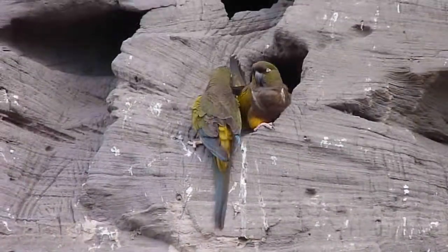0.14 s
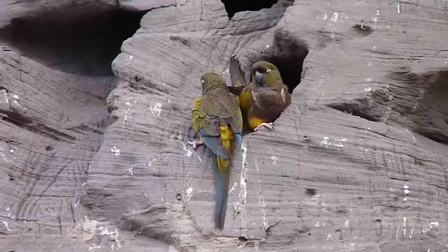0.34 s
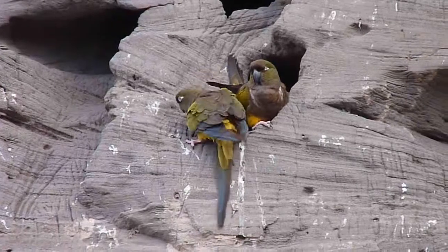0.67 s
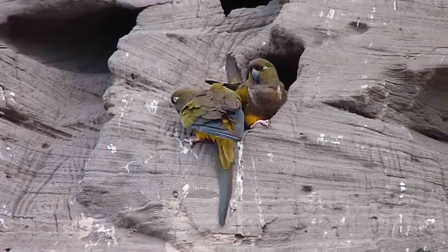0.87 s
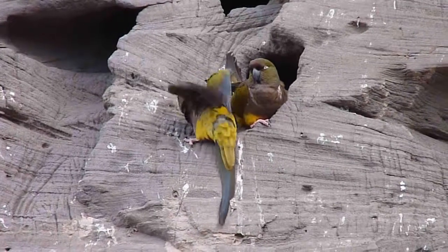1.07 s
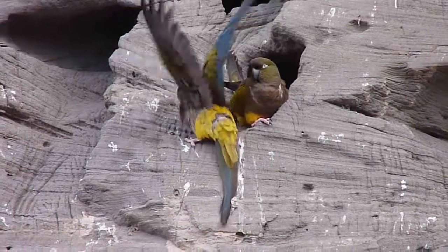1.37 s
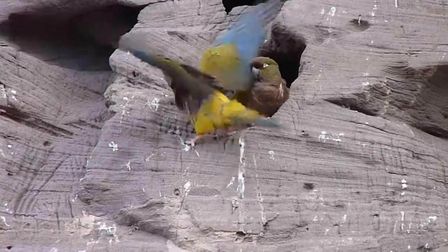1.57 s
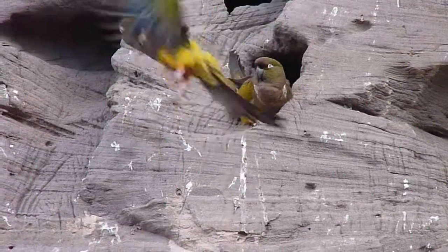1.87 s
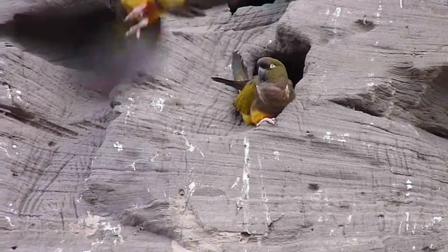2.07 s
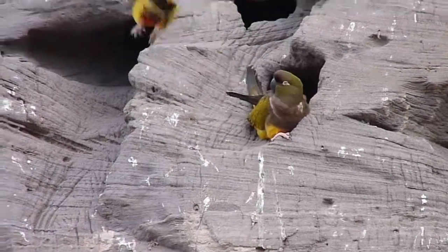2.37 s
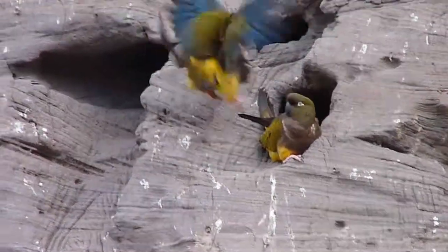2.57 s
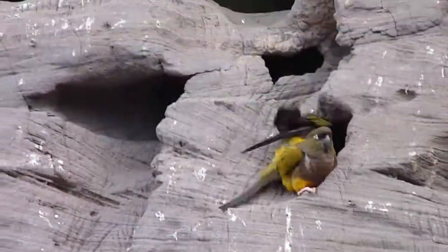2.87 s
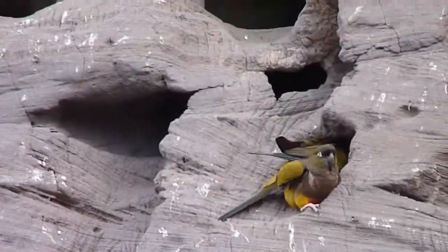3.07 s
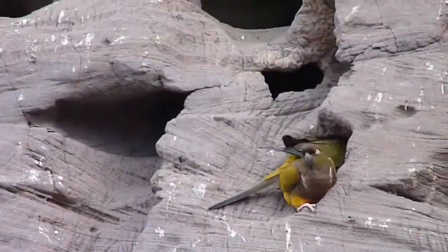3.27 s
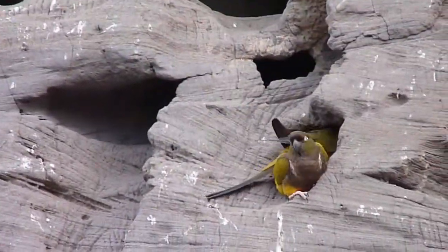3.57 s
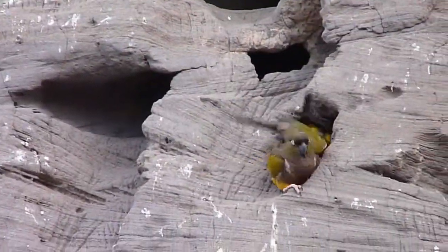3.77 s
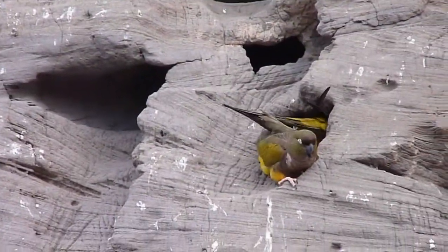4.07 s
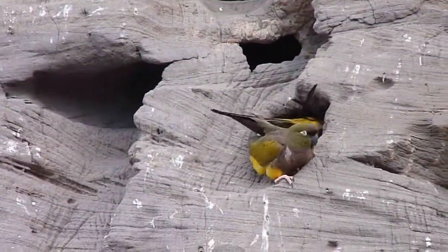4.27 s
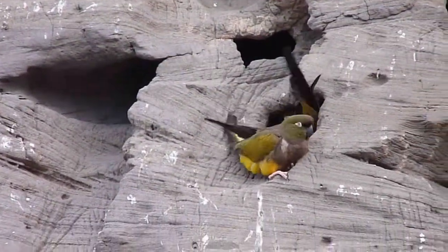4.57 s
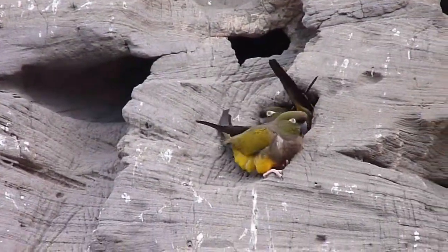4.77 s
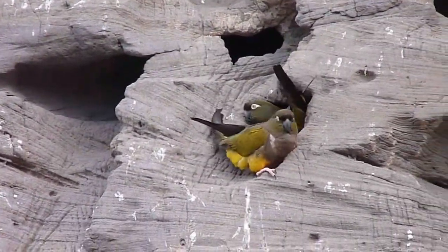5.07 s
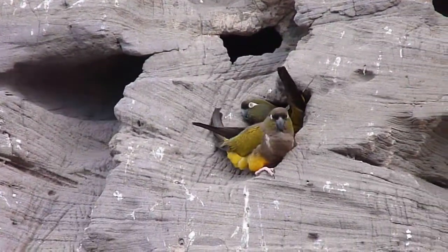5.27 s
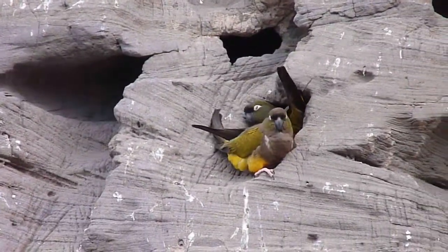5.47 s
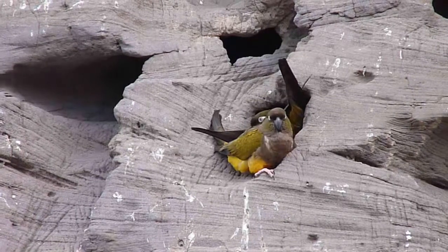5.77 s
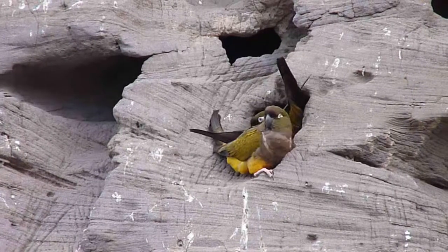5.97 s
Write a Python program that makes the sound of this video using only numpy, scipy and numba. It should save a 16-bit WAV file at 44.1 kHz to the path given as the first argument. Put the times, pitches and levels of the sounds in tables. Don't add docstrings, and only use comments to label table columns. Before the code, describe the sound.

A dense parrot colony calls without pause for about six seconds on an open cliff. From the start, far voices blur into a shrill, nasal, wavering chorus over faint distant surf, while low wind rumbles and flutters on the microphone, strongest from about 0.7 to 2.4 s. Short chirps, warbled calls and a clear whistle near 0.65 s poke out; harsh nearer screeches cluster around 2 to 2.5 s. Wind falls away near 2.8 s. A long rattling squawk swells at 2.7 to 2.9 s, another follows at 3.1, a brief one at 3.4 and a fainter one at 3.6, the far birds dipping beneath them. From 3.8 s nearer birds pile up again, raspy and trilling, especially around 5 s. Soft wind bumps return around 5.5 to 6 s, with a dull knock and sharp chirps at the end. Short rock echo; gritty small-camera sound.

```python
import sys
import numpy as np
from scipy import signal
from scipy.fft import rfft, irfft
from scipy.io import wavfile
from scipy.ndimage import uniform_filter1d
from numba import njit

SR = 44100
rng = np.random.default_rng(int(sys.argv[2]) if len(sys.argv) > 2 else 0)


def master_out(mix):
    frames = np.transpose(np.atleast_2d(mix))
    ceiling = np.clip(frames, -1, 1)
    pcm = np.round(ceiling * 32767).astype(np.int16)
    wavfile.write(sys.argv[1], SR, pcm)


def decibels_to_gain(level_db):
    exponent = np.asarray(level_db, float) / 20
    return 10 ** exponent


N = 270333


def level(x, db):
    return x * decibels_to_gain(db) / np.sqrt(np.mean(x ** 2))


def walk(rate_hz):
    hold = int(SR / rate_hz)
    steps = np.repeat(rng.standard_normal(N // hold + 1), hold)
    slewed = uniform_filter1d(uniform_filter1d(steps, hold), hold)
    return level(slewed[:N], 0)


def curves(table):
    s, *columns = np.transpose(table)
    return [np.interp(np.arange(N) / SR, s, c) for c in columns]


def colour(x, points):
    hz, db = np.transpose(points)
    bins_hz = np.maximum(np.arange(len(x) // 2 + 1) * SR / len(x), 1)
    gain_db = np.interp(np.log(bins_hz), np.log(hz), db)
    return irfft(rfft(x) * decibels_to_gain(gain_db), len(x))


@njit
def add(out, calls, gains, waver, flutter, edge, scoop):
    for c in range(len(calls)):
        start, n, place = int(calls[c, 0] * SR), int(calls[c, 1] * SR), int(calls[c, 5])
        from_hz, to_hz, rough = calls[c, 2], calls[c, 3], calls[c, 4]
        phase = place * 1.
        for i in range(max(0, -start), min(n, out.shape[1] - start)):
            u, j = i / n, (place + i) % len(waver)
            bend = 1 - scoop * (np.exp(-i / edge) + np.exp((i - n) / edge) / 2)
            hz = (from_hz + u * (to_hz - from_hz)) * bend
            phase += 2 * np.pi / SR * hz * (1 + rough * waver[j])
            push = min(1., min(i, n - i) / edge) * flutter[j] ** rough
            for k in range(5):
                out[k, start + i] += push * gains[c, k] * np.sin((k + 1) * phase)


def sing(times, rough, partial_db, edge_s, scoop):
    waver = .03 * walk(50) + .022 * walk(400)
    flutter = decibels_to_gain(4.5 * walk(70) + 3.5 * walk(250))
    places = rng.random(len(times)) * N
    calls = np.column_stack([times, np.full(len(times), rough), places])
    out = np.zeros((5, N))
    add(out, calls, np.sqrt(2) * decibels_to_gain(partial_db), waver, level(flutter, 0), edge_s * SR, scoop)
    return out


# time in seconds, rumble in dB.
GUSTS = [(0, -38), (.19, -39.5), (.7, -33), (1.37, -34.5), (1.55, -31), (1.8, -32), (1.9, -36), (2.08, -29),
         (2.32, -32.5), (2.37, -35.5), (2.77, -40), (2.83, -53.5), (3.84, -40.5), (4.22, -47.5),
         (4.45, -49.5), (5.1, -44.5), (5.3, -44), (6.13, -47)]
# centre in seconds, length in seconds, rumble change in dB.
EDDIES = [(0.126, 0.03, 14.5), (0.775, 0.075, -4), (0.87, 0.075, 2), (1.102, 0.071, 4.5), (1.3, .12, 2.5),
          (1.402, 0.057, 5), (2.26, .08, -5), (4.1, 0.22, 2.5), (4.52, 0.065, -9), (1.931, 0.051, 5.5),
          (2.938, 0.098, 3.5), (3.303, 0.17, 3.5), (3.883, 0.034, -4), (3.973, 0.075, 4.5),
          (4.075, 0.054, -11), (4.176, 0.022, 12), (4.63, 0.12, 5), (4.783, 0.094, -6), (5.1, 0.067, 5),
          (5.505, 0.069, 11.5), (5.694, 0.17, 12.5), (5.97, 0.07, -9), (6.057, 0.12, 9)]
# frequency in Hz, density in dB per Hz.
WIND_SPECTRUM = [(12, -56), (20, -33), (27, -21.5), (48, -13), (76, -2), (129, -1), (177, -7), (342, -17.5),
                 (506, -25), (693, -28.5), (850, -28), (1100, -29), (1870, -120)]
# start in seconds, peak in dB, frequency in Hz.
BUFFETS = [
    (6.026, -21.5, 207),
    (6.04, -46, 121),
]


def wind():
    t = np.arange(N) / SR
    gust_db, = curves(GUSTS)
    eddy_db = sum(db * np.exp(-(2 * (t - s) / length) ** 2) for s, length, db in EDDIES)
    rumble_db = gust_db + eddy_db
    upper_db = -47 + .7 * (gust_db + 40.5) + .54 * eddy_db
    throb, parts = walk(18), np.zeros((2, N))
    noise = colour(rng.standard_normal(N), WIND_SPECTRUM)
    for hz in 28 * 2 ** np.arange(0, 5.1, .5):
        band = colour(noise, [(hz / 1.5, -40), (hz / 1.2, -3), (hz, 0), (hz * 1.2, -3), (hz * 1.5, -40)])
        parts[int(hz > 210)] += band * decibels_to_gain(1.2 * throb + 1.5 * walk(25))
    out = level(parts[0], -.43) * decibels_to_gain(rumble_db) + level(parts[1], .07) * decibels_to_gain(upper_db)
    for s, peak_db, hz in BUFFETS:
        since_s = np.clip(t - s - .002, 0, None)
        swell = np.sin(np.pi * np.clip(since_s * hz / 1.15, 0, 1))
        out -= decibels_to_gain(peak_db + 1) * np.sin(2 * np.pi * hz * since_s) * swell
    return out


# frequency in Hz, density in dB per Hz.
SURF_SPECTRUM = [(250, -30), (400, -12), (750, -14), (1250, -3), (1620, -16), (2300, -4), (2750, -9),
                 (3100, -24), (5000, -31), (7800, -38)]


def surf():
    noise = colour(rng.standard_normal(N), SURF_SPECTRUM)
    return level(noise, -49.5) * decibels_to_gain(2.2 * walk(2.61))


# time in seconds, level in dB, shrillness (octaves over fundamentals) in dB.
CHORUS = [(0, -49.5, -1), (.3, -42.5, -4.5), (.45, -49.5, -5.5), (.8, -44, -2), (.97, -49.5, -6),
          (1.47, -47, 0.5), (1.67, -42.5, -3), (2.15, -46.5, -1.5), (2.7, -42, 0.5), (2.88, -46, 2),
          (3.04, -53, -1), (3.12, -44.5, 3), (3.9, -41.5, -1), (4.11, -45.5, -1), (4.88, -42.5, -0.5),
          (5.12, -47, 0), (5.58, -44.5, -5.5), (6.13, -45.5, 0.5)]
# frequency in Hz, gain in dB.
THROAT = [(600, 12), (1000, -15), (1260, -3.5), (1600, 4.5), (2000, -3), (2450, 0), (2750, -7.5),
          (3100, -17.5), (3600, -19.5), (5500, -33.5)]
# frequency in Hz, gain in dB.
BEAK = [(2650, 0), (2950, -7), (3400, 0), (4100, -6), (4750, 3), (5250, 1), (5700, -10)]
# 3rd, 4th and 5th partial below the octave in dB.
OVERTONES_DB = [-22, -25, -39]


def chorus(count=1100):
    start, length = rng.random((count, 2)).T
    pitch, glide, loud, shrill = rng.standard_normal((count, 4)).T
    hz = 1150 * np.exp(.14 * np.clip(pitch, -1.5, 1.7))
    bend = .07 * np.clip(glide, -1.6, 1.6)
    times = np.column_stack([start * N / SR - .05, .04 + .13 * length, hz * (1 - bend), hz * (1 + bend)])
    tilt_db = 2.7 * shrill[:, None] * [-1, 1, 1, 1, 1]
    partial_db = .82 * loud[:, None] + tilt_db + ([0, 0] + OVERTONES_DB)
    rows = sing(times, .6, partial_db, .018, .2)
    overtones = colour(rows[2:].sum(axis=0), BEAK)
    layers = [colour(row, THROAT) for row in (rows[0], rows[1], overtones)]
    low, octave, top = (row / np.sqrt(uniform_filter1d(row ** 2, SR // 10)) for row in layers)
    level_db, shrill_db = curves(CHORUS)
    low_db = level_db - shrill_db / 2 - 2.5
    octave_db = level_db + shrill_db / 2
    top_db = -56 + octave_db + 44.5
    return low * decibels_to_gain(low_db) + octave * decibels_to_gain(octave_db) + top * decibels_to_gain(top_db)


def cliff(x):
    t60_s, tail_db, gap_s = .2, -12, .012
    t = np.arange(SR // 2) / SR
    tail = rng.standard_normal(len(t)) * decibels_to_gain(-60 * t / t60_s) * (t > gap_s)
    return x + decibels_to_gain(tail_db) * signal.fftconvolve(x, tail / np.linalg.norm(tail))[:N]


# peak time in seconds, peak in dB, octave in Hz.
YELPS = [(0.169, -34, 2150), (0.2149, -34.5, 2075), (0.7811, -34.5, 2576), (0.9812, -41, 2250),
         (1.6776, -36, 2497), (1.7195, -37, 2380), (2.0797, -34, 2106), (2.1695, -31, 2396),
         (2.2498, -33, 2220), (2.4753, -33, 1970), (2.5541, -44, 2295), (2.6803, -35, 2030),
         (3.472, -37, 1870), (3.6611, -41, 2160), (3.8452, -35, 2440), (3.9624, -34.5, 2260),
         (4.0547, -41, 2400), (4.0856, -34, 2460), (4.3231, -39, 2144), (4.6204, -43, 2073),
         (4.8708, -35, 2213), (5.0215, -32, 2444), (5.0529, -36, 2403), (5.1098, -37, 2310),
         (5.2679, -31, 1987), (5.3752, -36, 2312), (5.5593, -37, 2220), (5.8252, -34, 2366),
         (6.054, -32, 2350), (6.116, -27, 2170)]


def yelps():
    s, peak_db, octave_hz = np.transpose(YELPS)
    times = np.column_stack([s - .004, np.full(len(s), .024), octave_hz * .49, octave_hz * .51])
    partial_db = peak_db[:, None] + [-16, -6, -32, -40, -55]
    return sing(times, .25, partial_db, .007, .04).sum(axis=0)


# start and length in seconds, start and end pitch in Hz, octave in dB.
WHISTLES = [
    (.632, .068, 1135, 1148, -37.5),
    (1.525, .045, 1040, 1115, -45),
    (1.676, .036, 1000, 1200, -46),
    (2.078, .045, 1000, 1170, -44),
    (5.7, .04, 990, 1105, -56),
    (5.768, .035, 1155, 1165, -50),
    (6.088, .05, 920, 1095, -42),
]


def whistles():
    rows = np.array(WHISTLES)
    octave_db = rows[:, 4]
    pure = (rows[:, 1] > .066) & (rows[:, 3] < 1.05 * rows[:, 2])
    third_db = octave_db - 13 - 20 * pure
    fourth_db = octave_db - 23 - 6 * pure
    partial_db = np.column_stack([octave_db - 18, octave_db, third_db, fourth_db, octave_db - 45])
    return sing(rows[:, :4], .08, partial_db, .006, .03).sum(axis=0)


# start and length in seconds, start and end pitch in Hz, octave in dB.
SWEEPS = [(.75, .085, 1060, 1200, -49), (.97, .04, 1070, 1100, -48), (1.12, .05, 1080, 1190, -50),
          (1.17, .07, 1160, 1190, -49), (1.72, .035, 1190, 1190, -49), (1.755, .05, 975, 1090, -51),
          (1.835, .04, 1135, 1105, -49), (4.295, .035, 920, 1080, -47), (5.742, .028, 990, 1150, -46),
          (5.768, .035, 1155, 1165, -47), (5.93, .03, 1170, 1230, -49), (5.975, .02, 1220, 1170, -47),
          (3.8, .05, 1120, 1130, -49)]
# start and length in seconds, start and end pitch in Hz, octave in dB.
THIN_GLIDES = [(5.698, .038, 975, 1105, -44), (1.555, .045, 1110, 1135, -45), (1.52, .075, 960, 1030, -47),
               (1.615, .06, 990, 1005, -45), (1.69, .08, 1190, 1160, -47), (1.4, .06, 1010, 1060, -47),
               (.78, .075, 1270, 1240, -47), (.435, .035, 1200, 1210, -46), (.52, .03, 1225, 1215, -48),
               (.59, .04, 1190, 1330, -47), (1.28, .07, 1310, 1280, -47)]
# start and length in seconds, start and end pitch in Hz, level in dB.
HELD = [
    (1.585, .075, 1270, 1340, -46),
    (1.78, .085, 1345, 1320, -46),
    (1.71, .055, 1290, 1240, -46),
    (5.86, .1, 1230, 1265, -47),
    (1.3, .12, 1330, 1300, -50),
    (1.42, .12, 1150, 1200, -51),
    (1.05, .1, 1180, 1210, -49),
    (.7, .07, 1330, 1290, -49),
    (.55, .04, 1300, 1230, -48),
]
SWEEP_PARTIALS_DB = [-14, 0, -15, -26, -36]
THIN_PARTIALS_DB, HELD_PARTIALS_DB = [-14, 0, -27, -28, -34], [0, -12, -32, -42, -50]


def sweeps():
    rows = np.array(SWEEPS + THIN_GLIDES + HELD)
    voices = [SWEEP_PARTIALS_DB, THIN_PARTIALS_DB, HELD_PARTIALS_DB]
    partial_db = np.repeat(voices, [len(SWEEPS), len(THIN_GLIDES), len(HELD)], axis=0)
    return sing(rows[:, :4], .25, rows[:, 4:] + partial_db, .01, .02).sum(axis=0)


# start and length in seconds, start and end pitch in Hz, octave in dB.
TRILLS = [(0.835, .17, 1120, 1058, -47), (1.02, 0.076, 1050, 1000, -50), (1.123, 0.075, 794, 998, -45),
          (1.103, 0.11, 1235, 1258, -49.5), (1.218, 0.16, 1330, 1300, -51), (2.197, 0.076, 990, 990, -47),
          (2.231, 0.073, 1164, 1027, -43.5), (2.3, 0.14, 1020, 1044, -45), (2.36, 0.094, 1150, 1100, -44),
          (2.581, .09, 1150, 1200, -48), (.9, 0.11, 1280, 1246, -61), (1.378, 0.11, 1008, 1037, -47),
          (1.803, 0.15, 1134, 1106, -49.5), (3.217, 0.11, 1183, 1130, -53), (0.019, .14, 1146, 1220, -51),
          (0.342, 0.11, 997, 1276, -49), (0.496, 0.11, 1247, 1200, -52), (2.93, 0.097, 1206, 1138, -54),
          (2.464, 0.066, 950, 1015, -45.5), (2.499, .1, 1083, 1176, -42.5), (3.493, 0.14, 1266, 1296, -46),
          (3.619, .08, 1173, 1163, -46), (4.09, 0.079, 1250, 1250, -45), (4.285, 0.078, 867, 1162, -44),
          (4.419, 0.17, 1260, 1157, -49), (4.601, 0.19, 1050, 990, -44.5), (4.901, .055, 1198, 1030, -38),
          (4.943, 0.081, 1310, 1185, -43), (5.012, .23, 1203, 1165, -44.5), (5.25, 0.047, 849, 1047, -43),
          (5.307, 0.04, 808, 960, -42), (5.341, 0.1, 1259, 1110, -42), (5.489, .11, 1230, 1100, -46.5),
          (5.609, 0.18, 961, 1038, -43), (5.8, 0.083, 1233, 1150, -42), (5.872, .15, 1264, 1233, -47),
          (6.031, .06, 1004, 1210, -45)]
# start and length in seconds, start and end pitch in Hz, octave in dB.
OPEN_TRILLS = [(0, 0.064, 1200, 1206, -47.5), (.26, .07, 1210, 1176, -54), (.52, 0.065, 1200, 1270, -54),
               (0.744, .11, 1080, 1226, -50), (.93, .075, 1100, 1090, -48), (1.121, .1, 1150, 1200, -51),
               (2.7, 0.08, 1050, 1170, -47), (3.089, 0.11, 1130, 1174, -51), (3.22, 0.11, 1220, 1157, -52),
               (3.501, 0.065, 1200, 1220, -50), (4.295, .075, 980, 1150, -47),
               (4.559, 0.066, 1070, 1130, -52), (5.1, .13, 1180, 1200, -50), (5.529, .07, 1080, 1140, -48),
               (5.82, .1, 1180, 1197, -51), (5.941, .12, 1200, 1190, -53)]
TRILL_PARTIALS_DB = [-12, 0, -23, -33, -45]
OPEN_BEAK_DB = [0, 0, 9, 8, 5]


def trills():
    throb_hz, depth_db, swing = 35.87, 3, .036
    out = np.zeros(N)
    pitch_rasp, level_rasp, throb_drift = walk(300), walk(200), walk(40)
    open_partials_db = np.add(TRILL_PARTIALS_DB, OPEN_BEAK_DB)
    calls = [(row, TRILL_PARTIALS_DB) for row in TRILLS] + [(row, open_partials_db) for row in OPEN_TRILLS]
    for (s, length, from_hz, to_hz, octave_db), partials_db in calls:
        t = np.arange(int(min(length, N / SR - s) * SR)) / SR
        span = slice(int(s * SR), int(s * SR) + len(t))
        throb = 2 * np.pi * np.cumsum(throb_hz * (1 + .1 * throb_drift[span])) / SR
        glide_hz = np.interp(t, [0, length], [from_hz, to_hz])
        hz = glide_hz * (1 + swing * np.sin(throb) + .018 * pitch_rasp[span])
        phase = 2 * np.pi * np.cumsum(hz) / SR
        voice = sum(decibels_to_gain(db) * np.sin(k * phase) for k, db in enumerate(partials_db, start=1))
        push_db = octave_db - depth_db * np.cos(throb) + 3 * level_rasp[span]
        out[span] += voice * decibels_to_gain(push_db) * np.clip(np.minimum(t, length - t) / .01, 0, 1)
    return out


# start and length in seconds, start and end pitch in Hz, level in dB.
DEEP_CALLS = [(.212, 0.077, 1038, 1255, -49), (0.242, 0.063, 1177, 1220, -41), (.264, 0.041, 932, 814, -46),
              (0.311, 0.15, 1387, 1272, -45.5), (0.987, 0.17, 1096, 1334, -46),
              (1.196, 0.028, 1247, 1290, -43), (1.6, 0.02, 1303, 1405, -50),
              (1.901, 0.13, 1213, 1203, -42.5), (1.988, .16, 1282, 1298, -40),
              (2.039, 0.053, 1337, 1415, -45), (3.796, 0.13, 1176, 1334, -48),
              (4.144, 0.099, 1125, 1318, -44), (4.584, 0.051, 1274, 1190, -40),
              (4.605, 0.051, 1470, 1463, -43.5), (4.615, .14, 1205, 1210, -44),
              (4.827, 0.052, 1356, 1428, -46.5), (5.149, 0.026, 1370, 1270, -53),
              (5.402, 0.038, 1254, 1368, -39), (5.437, 0.049, 1350, 1387, -42.5),
              (5.969, 0.13, 1353, 1206, -43), (1.279, 0.14, 1350, 1346, -56),
              (2.742, 0.08, 1264, 1287, -45.5), (1.632, 0.015, 978, 970, -41.5),
              (5.283, 0.079, 1128, 1307, -40.5), (1.0, 0.086, 1180, 1200, -48),
              (5.039, 0.17, 1264, 1300, -53), (4.7, 0.068, 1196, 1210, -45.5),
              (5.899, 0.11, 1280, 1232, -43)]
# start and length in seconds, start and end pitch in Hz, level in dB.
FULL_CALLS = [(0.125, 0.095, 910, 1083, -48.5), (0.444, .023, 1186, 1250, -48),
              (0.765, 0.093, 1297, 1207, -43), (1.134, 0.1, 1205, 1355, -41.5),
              (1.459, 0.21, 994, 1130, -46.5), (1.67, 0.12, 1303, 1251, -46.5),
              (3.437, 0.093, 1257, 1318, -45.5), (2.051, 0.079, 859, 1370, -44.5),
              (2.173, 0.088, 1203, 1106, -45.5), (2.249, .11, 1080, 1110, -47),
              (3.125, 0.06, 1246, 1260, -46), (3.404, 0.084, 1244, 1254, -45), (4.2, 0.1, 1262, 1250, -46),
              (4.511, 0.13, 1280, 1033, -46.5), (4.738, 0.085, 1270, 1276, -45.5),
              (4.924, 0.065, 1453, 1270, -44.5), (4.966, 0.18, 1227, 1313, -49.5),
              (5.287, 0.11, 1130, 1366, -49), (5.676, 0.067, 1020, 1080, -47.5),
              (5.746, .11, 1216, 1388, -47), (5.871, 0.15, 1293, 1236, -42.5), (.8, 0.096, 1260, 1203, -51),
              (1.223, 0.078, 1350, 1340, -56.5), (5.433, 0.051, 1300, 1340, -54)]
# start and length in seconds, start and end pitch in Hz, level in dB.
SHRILL_CALLS = [(0.201, 0.13, 772, 810, -44.5), (1.283, 0.073, 1320, 1233, -43),
                (1.895, 0.12, 999, 919, -43), (1.97, 0.049, 1033, 1026, -39.5),
                (2.323, 0.037, 947, 1013, -39), (2.345, 0.066, 863, 1100, -40),
                (2.485, 0.085, 998, 1194, -42.5), (2.593, 0.054, 1119, 1080, -47),
                (2.6, 0.067, 1188, 1256, -44.5), (2.671, 0.13, 999, 1031, -40.5),
                (3.805, 0.16, 1141, 1047, -43.5), (3.947, 0.13, 1031, 1042, -47),
                (3.956, 0.08, 1170, 1177, -46), (3.991, 0.15, 1308, 1243, -43),
                (4.327, 0.056, 1073, 1323, -41), (4.379, 0.14, 1240, 1256, -40),
                (4.594, 0.064, 1092, 984, -54), (4.633, .14, 1141, 1152, -48),
                (4.873, 0.0775, 1154, 1117, -41.5), (4.934, 0.092, 1053, 932, -44),
                (5.021, 0.048, 1178, 1255, -36.5), (5.373, 0.042, 1184, 1169, -42.5),
                (5.51, 0.069, 1237, 1156, -43.5), (5.801, 0.11, 1248, 1136, -40.5)]


def near_birds():
    rows = np.array(DEEP_CALLS + FULL_CALLS + SHRILL_CALLS)
    voices_db = [(0, -5), (0, 0), (-9.5, 0)]
    counts = [len(DEEP_CALLS), len(FULL_CALLS), len(SHRILL_CALLS)]
    low_db, octave_db = rows[:, 4] + np.repeat(voices_db, counts, axis=0).T
    times = rows[:, :4] + [-.006, .01716, 0, 0]
    partial_db = np.column_stack([low_db, octave_db, octave_db - 23, octave_db - 35, octave_db - 45])
    return decibels_to_gain(-1.5) * sing(times, .62, partial_db, .012, .05).sum(axis=0)


# start and length in seconds, octave in dB and in Hz at full effort, swell in dB.
SQUAWKS = [
    (2.66, .265, -38, 2296, 9),
    (3.07, .165, -37, 2100, 10),
    (3.39, .14, -41, 2070, 3),
    (3.595, .18, -46.5, 2230, 3),
]
# voice cycles per rattle pulse, then fundamental, third and higher partials in dB.
RATTLES = [(7, -12, -19.5, -29), (8, -11, -20, -28), (5, -12, -17, -23), (5, -9, -13, -18.5)]
# pitch sag per dB while rising and while falling, roughness 0-1.
SAGS = [(.0125, .029, .26), (.017, .008, .3), (.014, .014, .5), (.014, .02, .45)]


def squawks():
    out, t = np.zeros(N), np.arange(N) / SR
    peak_share = .63
    for squawk, rattle, sag in zip(SQUAWKS, RATTLES, SAGS):
        s, length, peak_db, peak_hz, swell_db = squawk
        cycles, low_db, third_db, top_db = rattle
        rise, fall, rough = sag
        u = np.clip((t - s) / length, 0, 1) - peak_share
        slack_db = swell_db * np.abs(u / np.where(u < 0, peak_share, 1 - peak_share)) ** 2.4
        octave_db = peak_db - slack_db
        octave_hz = peak_hz * (1 - np.where(u < 0, rise, fall) * slack_db)
        waver = 1 + rough * (.008 * walk(60) + .013 * walk(300))
        phase = np.pi * np.cumsum(octave_hz * waver) / SR
        rattle_phase = phase / cycles + rough * (walk(30) + walk(140))
        chop = decibels_to_gain(5 * rough * walk(120)) * np.exp((1.7 - .5j) * np.cos(rattle_phase))
        partials_db = [low_db, 0, third_db, top_db, top_db - 8]
        voice = sum(decibels_to_gain(db) * np.exp(1j * k * phase) for k, db in enumerate(partials_db, start=1))
        gate = np.clip(np.minimum(t - s, s + length - t) / .022, 0, 1)
        out += level((chop * voice).imag, 0) * decibels_to_gain(octave_db) * gate
    return out


def hush():
    t = np.arange(N) / SR
    squawking = sum((t > s + length - min(length, .17)) & (t < s + length) for s, length, *_ in SQUAWKS)
    return decibels_to_gain(-5 * uniform_filter1d(1. * squawking, SR // 30))


def scene():
    background = wind() + hush() * (chorus() + surf())
    clear_birds = cliff(trills() + sweeps())
    harsh_birds = colour(near_birds() + squawks(), BEAK)
    return (background + clear_birds + cliff(harsh_birds + whistles() + yelps()))[None]


# frequency in Hz, level in dB.
CAMERA_WHINE = (6667, -86)


def roll_off(x):
    return signal.sosfilt(signal.butter(12, 15680, fs=SR, output="sos"), x)


def record(dry):
    t = np.arange(N) / SR
    whine_hz, whine_db = CAMERA_WHINE
    x = dry[0] + decibels_to_gain(whine_db) * np.sin(2 * np.pi * whine_hz * t) - .0048
    slow = signal.resample_poly(x, 160, 441)
    slope = uniform_filter1d(np.abs(np.gradient(slow)), size=24)
    slow = slow + (decibels_to_gain(-45) * slope + decibels_to_gain(-76)) * rng.standard_normal(len(slow))
    joined = np.interp(np.arange(3 * len(slow)) / 3, np.arange(len(slow)), slow)
    joined = signal.resample_poly(joined, 147, 160)[:N]
    joined = joined + decibels_to_gain(-53) * np.exp(-t / .001) * rng.standard_normal(N)
    mix = colour(joined, [(9000, 0), (12000, -2), (15000, -3)])[None]
    return roll_off(mix)


dry = scene()
out = record(dry)
master_out(out)
```